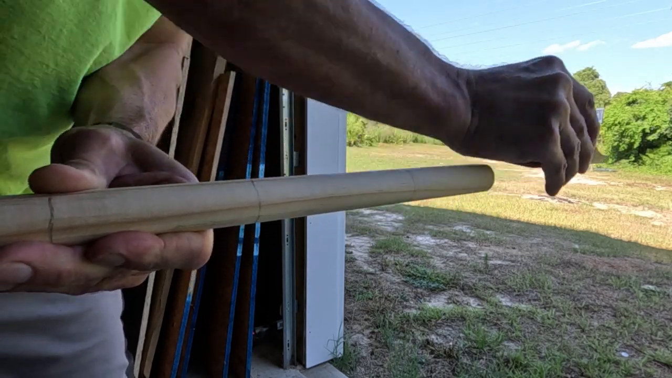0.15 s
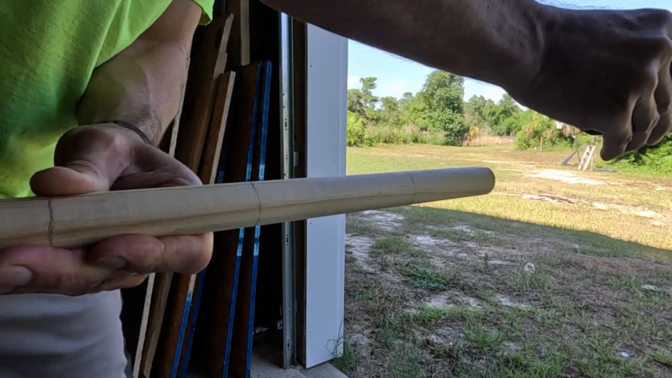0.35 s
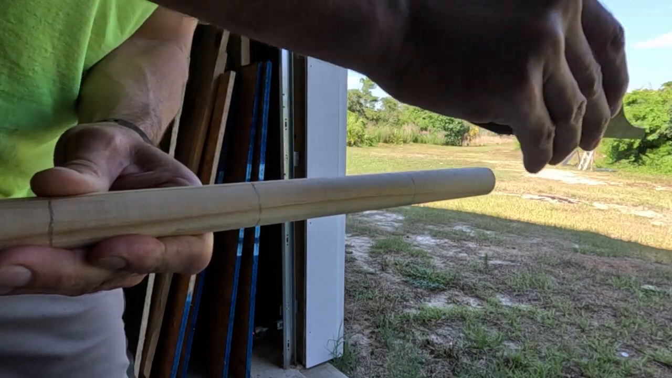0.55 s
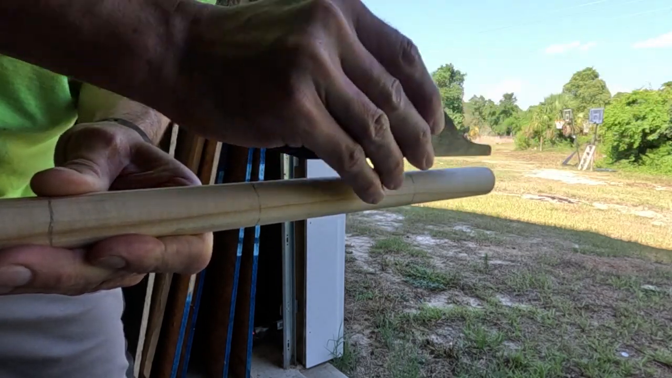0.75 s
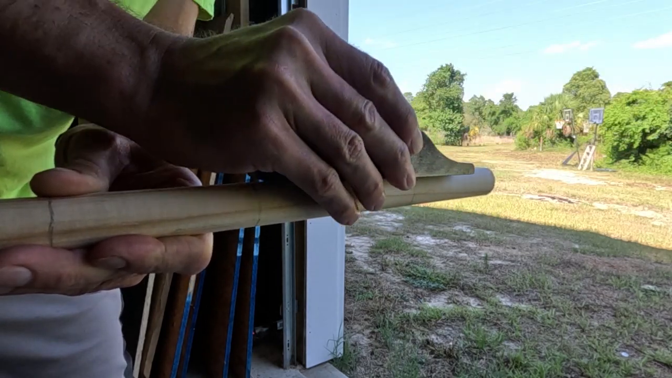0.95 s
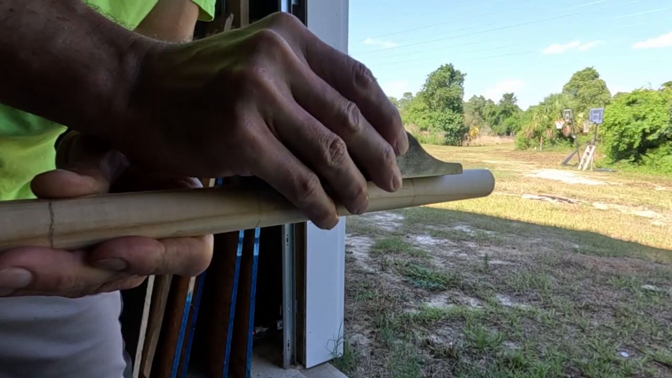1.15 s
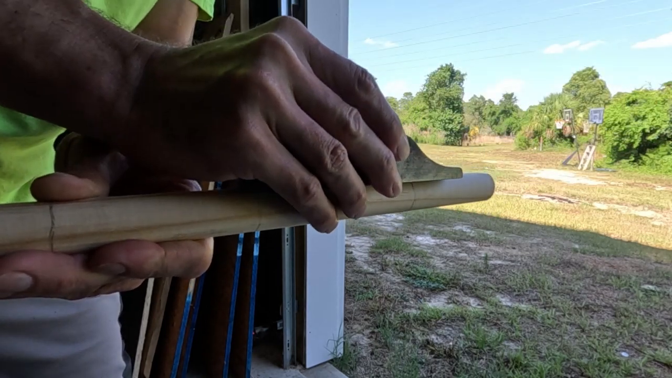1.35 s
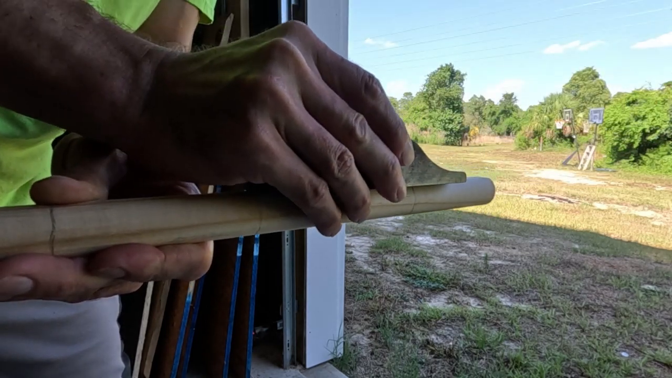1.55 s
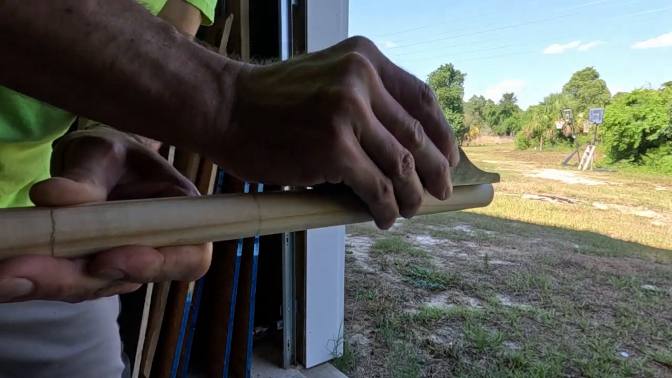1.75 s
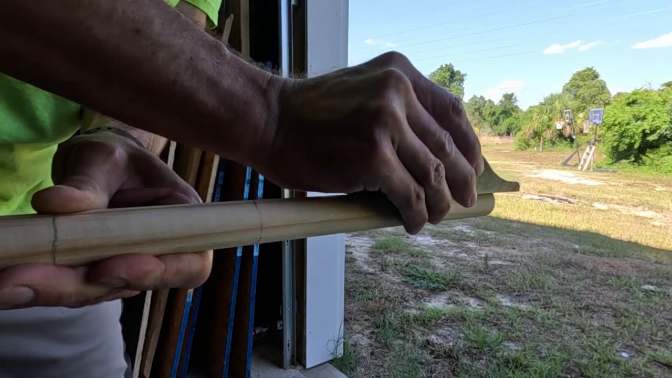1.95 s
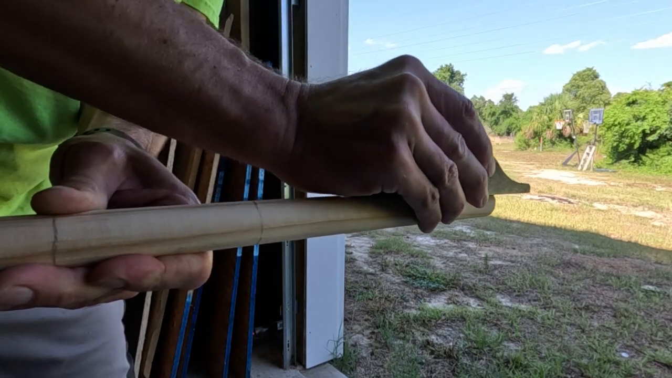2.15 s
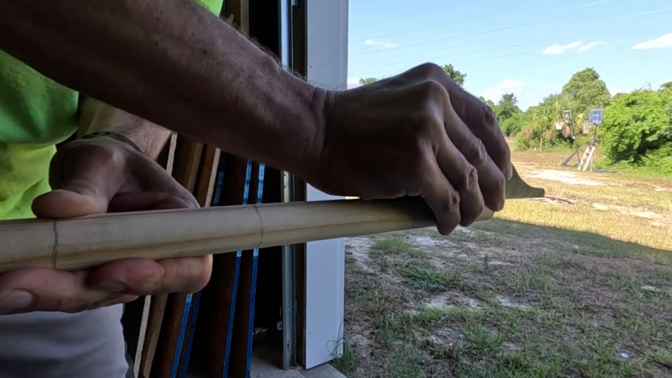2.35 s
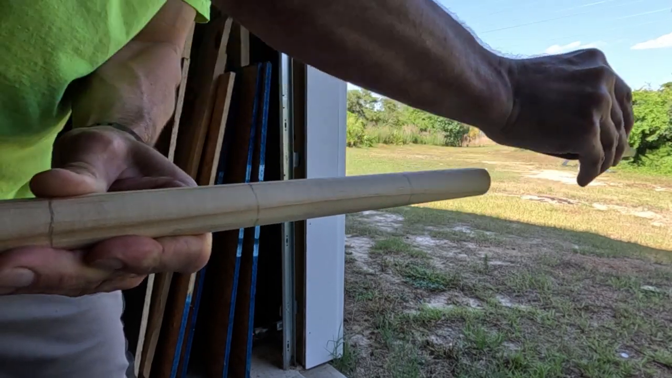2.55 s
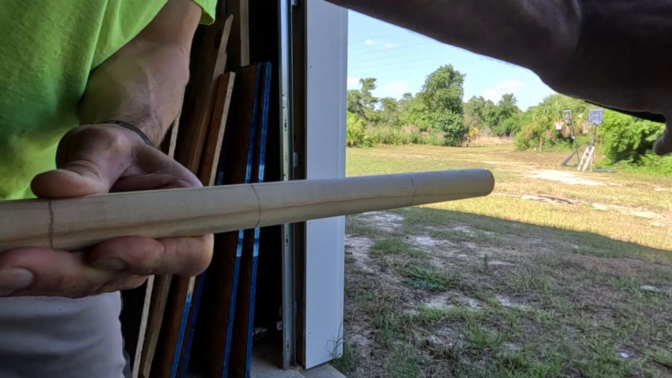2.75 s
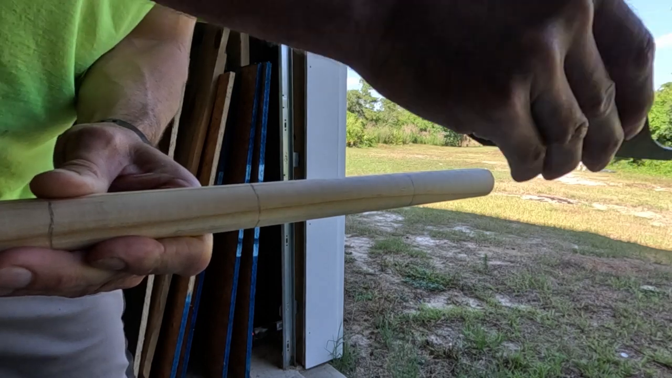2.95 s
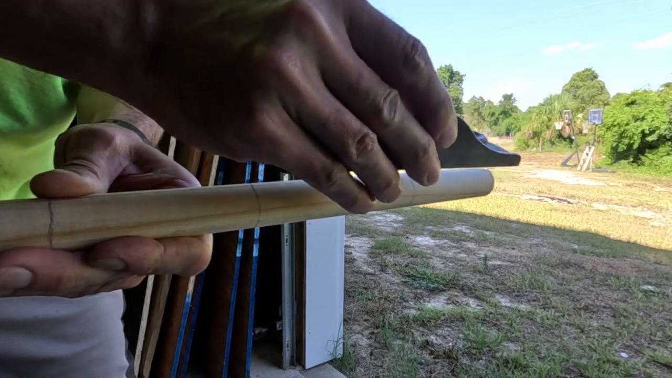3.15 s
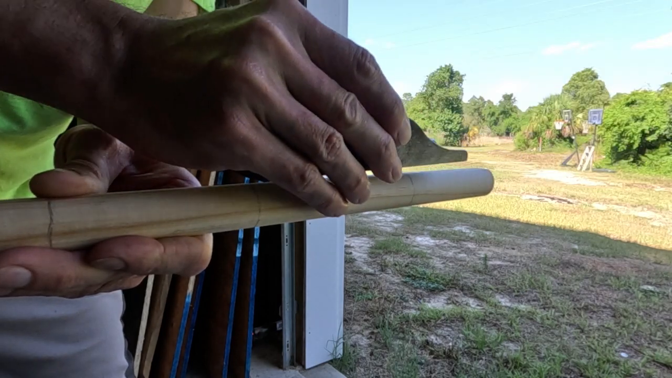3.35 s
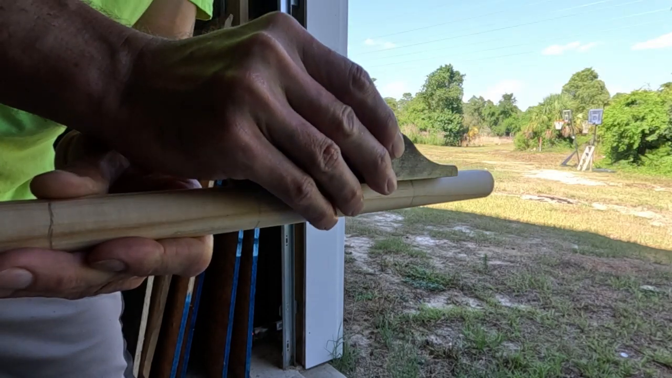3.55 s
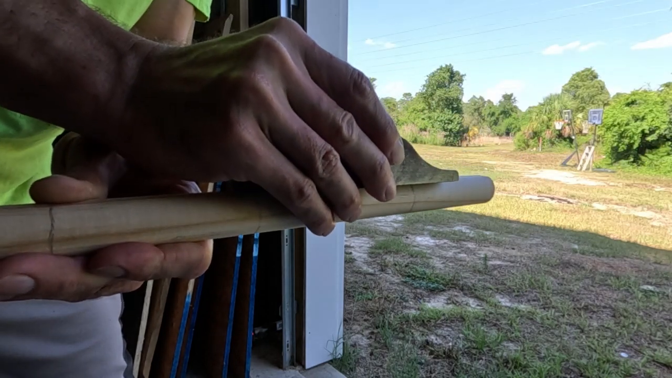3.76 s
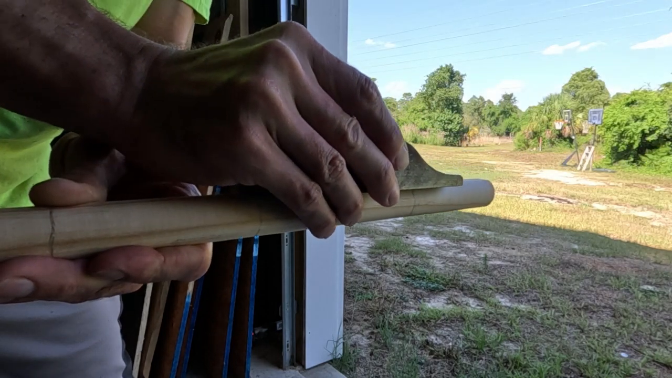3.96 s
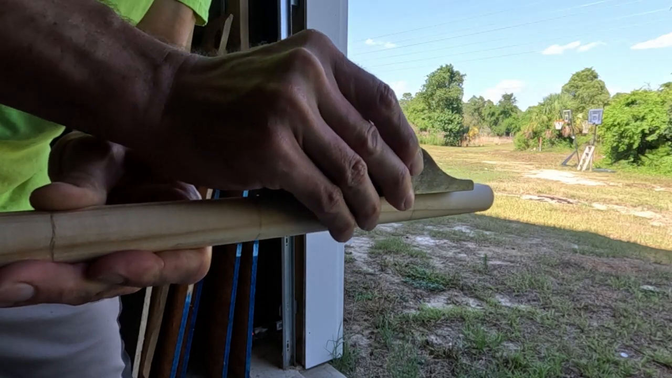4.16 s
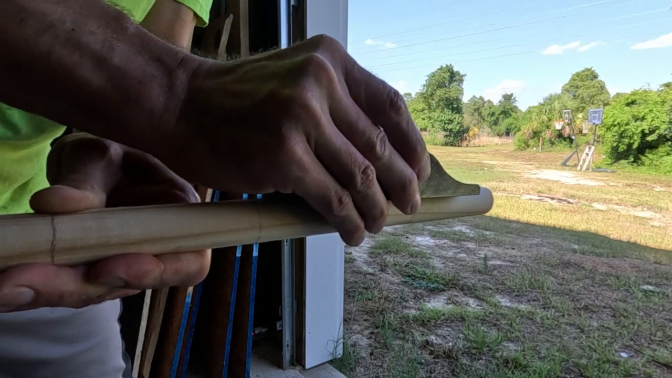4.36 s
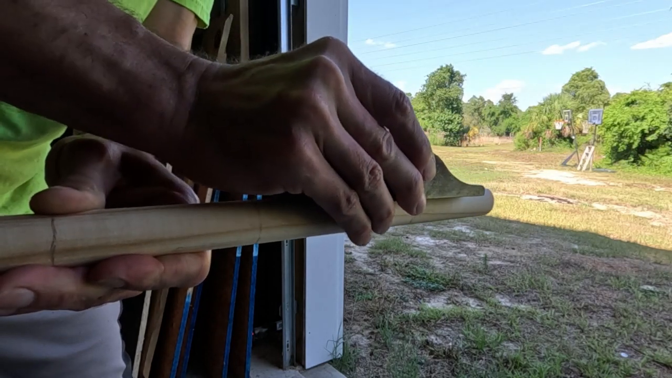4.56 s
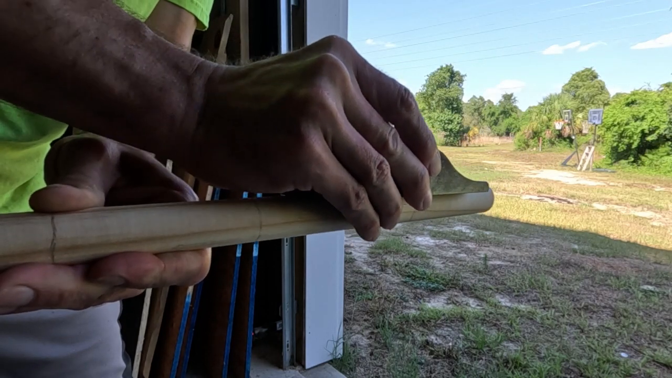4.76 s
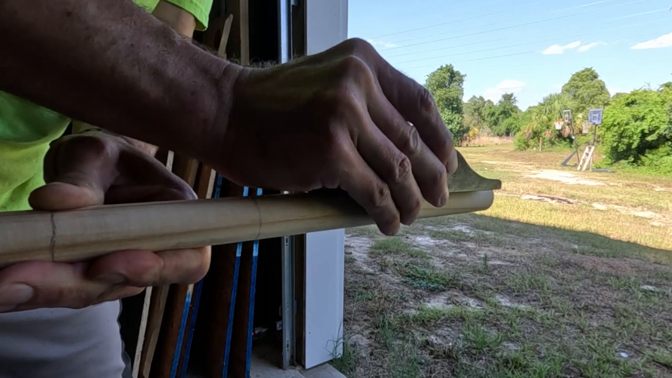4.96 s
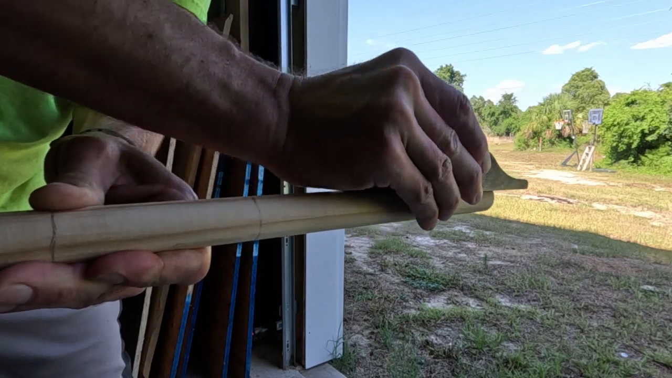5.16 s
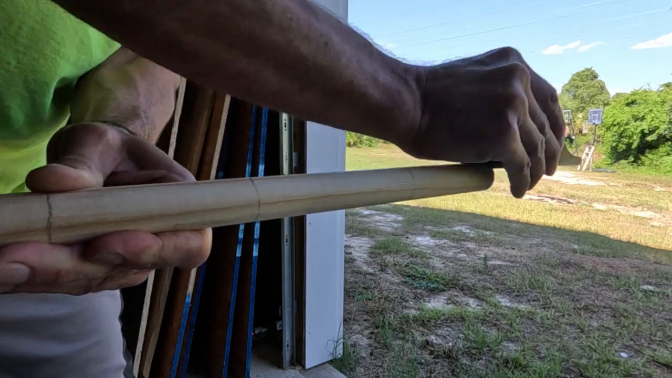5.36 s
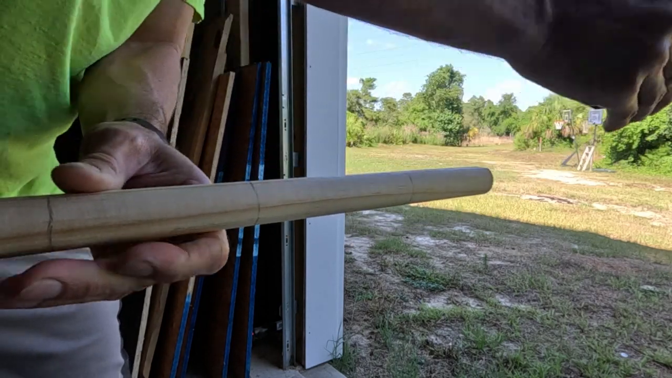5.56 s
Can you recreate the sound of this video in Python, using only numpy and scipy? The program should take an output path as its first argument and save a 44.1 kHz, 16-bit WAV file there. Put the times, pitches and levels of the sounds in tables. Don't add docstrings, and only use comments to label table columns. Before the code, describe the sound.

Very close, in a workshop open to a field. A harsh, fibrous scrape is already running at 0 s, loudest at once, and fades by 0.3 s with low thumping. Near-quiet follows: soft air rumble and a thin, faint insect hiss. At 1.02 s the iron plane is set down with a modest woody-metallic knock and a loose rattle. From about 1.55 s a rasp rises to 1.75 s, short nudges follow, a heavy dull bump lands at 1.97 s, then a stronger push grows from 2.05 to 2.45 s, ending in a thud and a tearing shaving until 2.6 s. Quiet again, with tiny grazes before a hard, bright clack at 3.53 s and a brief slide. Light chatter catches at 4.1 s, with patchy faint scraping to 4.8 s. The last stroke swells from 4.85 s, with low staff hum, to a loud ripping peak at 5.32 s, then small ticks and falling chips end it.

```python
import sys
import numpy as np
from scipy import signal
from scipy.fft import rfft, irfft, next_fast_len
from scipy.io import wavfile
from scipy.ndimage import uniform_filter1d

SR = 44100
rng = np.random.default_rng(int(sys.argv[2]) if len(sys.argv) > 2 else 0)


def volts(x):
    e = np.asarray(x, float) / 20
    return 10 ** e


def store_pcm(level_fs):
    pcm = np.round(np.clip(level_fs, -1, 1) * 32767).astype(np.int16)
    wavfile.write(sys.argv[1], SR, np.atleast_2d(pcm).T)


N = 247401

# f/Hz, width/Hz, level/dB
BLADE_MODES = [(2950, 380, 11), (3560, 380, 13), (4150, 450, 13), (5280, 200, 4), (6850, 140, 5),
               (7250, 300, 5), (9050, 200, -8)]


def seated(gains_db):
    low, main, upper, high, cap = gains_db
    gains_db = [low, main, upper, high, cap, cap, 0]
    return [(hz, width, db + gain_db) for (hz, width, db), gain_db in zip(BLADE_MODES, gains_db)]


# f/Hz, level/(dB per Hz)
FIBRE_HISS = [(650, -100), (1100, -5.5), (1580, 0.5), (1900, -3), (3580, 2.5), (5930, -3.5), (7040, -4.5),
              (8500, -36), (11000, -69), (18700, -120)]
# f/Hz, level/(dB per Hz)
FIZZ_SPECTRUM = [(7000, -17.5), (8200, -3.5), (9500, -2.5), (10500, -18), (11300, -28.5), (12200, -19.5),
                 (13200, -28), (14300, -28.5), (15700, -33)]
# f/Hz, width/Hz, level/dB
BODY_MODES = [(1300, 170, -7), (1445, 60, -3), (1550, 45, 3), (1618, 50, -1), (1692, 38, 0)]
# f/Hz, width/Hz, level/dB
WOOD_MODES = [(534, 3600, 5.5), (627, 100, -14), (782, 84, -1), (974, 760, 2.5)]


def shave(rows, grip, seating):
    tears_per_s, spread_db, judder_db, blade_db = 9000, 1.5, 1.5, -4.5
    firm_db = -55.5
    slowest_ring_db_per_s = 336
    s, force_db = np.transpose(rows)
    t = np.arange(s[0], s[-1], 1 / SR)
    hiss_db = np.interp(t, s, force_db)
    fall_db = slowest_ring_db_per_s * t
    ring_db = np.maximum.accumulate(hiss_db + fall_db) - fall_db
    body_db = grip[0] + ring_db - hiss_db + 0.034 * (firm_db - ring_db)
    wood_db = grip[1] + ring_db - hiss_db + 0.014 * (firm_db - ring_db)
    fizz_db = grip[2] + 0.051 * (firm_db - hiss_db)

    tears = rng.standard_normal(len(t)) * (rng.random(len(t)) < tears_per_s / SR)
    strength_db = spread_db * np.minimum(rng.exponential(1, len(t)), 5)
    force = tears * volts(strength_db + judder_db * flicker(len(t), 0.041))

    blade = modes(force, seated(seating), waver_db=2.5, waver_s=0.01)
    sound = evened(evened(colour(force, FIBRE_HISS)) + volts(blade_db) * blade)
    sound = sound + volts(body_db) * modes(force, BODY_MODES, waver_db=2.0, waver_s=0.024)
    sound = sound + volts(wood_db) * modes(force, WOOD_MODES, waver_db=1.5)
    sound = sound + volts(fizz_db) * evened(colour(force, FIZZ_SPECTRUM))
    fade = signal.windows.tukey(len(t), 0.0011 / (t[-1] - t[0]))
    return s[0], fade * volts(hiss_db) * sound


# t/s, cutting force/dB
LONG_PUSHES = [
    [(1.48, -76), (1.532, -73), (1.608, -52.5), (1.652, -51), (1.662, -45.5), (1.732, -36), (1.776, -52.5),
     (1.79, -51)],
    [(2.03, -69), (2.086, -55), (2.18, -45), (2.292, -45.5), (2.33, -39.5), (2.39, -41), (2.434, -33.5),
     (2.46, -66)],
    [(4.24, -64), (4.328, -57), (4.384, -61), (4.4, -55.5), (4.546, -79), (4.59, -63), (4.694, -53.5),
     (4.8, -79)],
    [(4.8, -115), (4.824, -63.5), (4.89, -54.5), (5.118, -41.5), (5.238, -42), (5.28, -32.5), (5.322, -26),
     (5.338, -60), (5.35, -53)],
]
# t/s, cutting force/dB
SHORT_NUDGES = [
    [(0.0, -31.5), (0.006, -43), (0.056, -39.5), (0.068, -36.5), (0.1, -51)],
    [(0.1, -47.5), (0.136, -41), (0.206, -48), (0.222, -58.5), (0.3, -68)],
    [(1.79, -50), (1.799, -49), (1.804, -38.5), (1.84, -43), (1.921, -53.5), (1.927, -42), (2.03, -116)],
    [(2.46, -44), (2.502, -36.5), (2.554, -46), (2.568, -84), (2.64, -63)],
    [(5.35, -51), (5.385, -41), (5.41, -52), (5.418, -62), (5.43, -65), (5.44, -63)],
    [(5.44, -74), (5.51, -61.5), (5.53, -83), (5.564, -86), (5.61, -70)],
]
# t/s, cutting force/dB
CHATTER_PUSH = [(3.92, -85), (3.94, -68.5), (4.025, -65), (4.05, -56), (4.12, -46.5), (4.18, -59.5),
                (4.239, -65)]
# body/dB, wood/dB, fizz/dB, all over the hiss
PUSH_BEARING = [(-11, -20.5, -12.5), (-7, -10.5, -9), (-3, -8.5, -16), (1, -4, -11)]
NUDGE_BEARING = [(-9.5, -7, -14), (-25, -13.5, -14.5), (-6, -37, -11), (-18.5, -15, -10), (-38, -2.5, -18),
                 (1, 1.5, -23)]
CHATTER_BEARING = (-3, -10.5, -20)
# first four blade modes/dB, cap pair/dB
BLADE_SEATING = [(-3, -2, 0, -19, 2), (-5.5, -1.5, -4, 5, 5.5), (0.5, 5, 3, -13, 2),
                 (-6.5, -0.5, -5, 2, 3.5), (0.5, 0, -9, -1, -7), (6, 0, -3, -6, -6),
                 (-8, -3, -1.5, -6, 3.5), (3, -8, -5, 0, 4), (1, -7, 2, -6, -6), (0, -2, 2, -3, 4),
                 (5, 3, -4, -13, -16)]


def strokes():
    forces = LONG_PUSHES + SHORT_NUDGES + [CHATTER_PUSH]
    grips = PUSH_BEARING + NUDGE_BEARING + [CHATTER_BEARING]
    return track(shave(*stroke) for stroke in zip(forces, grips, BLADE_SEATING))


# t/s, peak/dB,
# f/Hz, width/Hz
SHARP_CLICKS = [(4.1222, -21.5, 2740, 1680), (1.6885, -33, 2800, 1500), (1.8018, -37, 3600, 2500),
                (2.3127, -30, 4300, 900), (5.1033, -35, 3400, 900), (0.25, -42, 4800, 6000),
                (1.0215, -33, 4000, 2500), (1.024, -44, 8500, 1200), (1.0235, -48, 12000, 900),
                (1.031, -29.5, 1310, 250), (1.028, -40, 3200, 900), (1.9697, -25, 760, 590),
                (1.9701, -37, 2200, 1800), (3.5274, -16.5, 4200, 900), (3.5282, -18, 2700, 600),
                (3.528, -44.5, 7500, 3000), (3.19, -62, 2000, 2000), (3.356, -60, 2200, 1800),
                (3.44, -57.5, 2400, 540), (4.1215, -32, 13000, 3000), (0.0692, -31, 12500, 3000),
                (2.435, -31, 11000, 4000), (2.4779, -32, 3570, 1500), (2.0648, -47, 4390, 1200),
                (2.0882, -45, 2500, 1200), (4.4, -45, 4800, 1500), (4.5, -39, 3100, 1500),
                (0.0258, -31, 3230, 1200), (2.437, -30, 1400, 700), (2.7, -55, 6500, 4000)]


def snaps():
    events = []
    for s, peak_db, hz, width in SHARP_CLICKS:
        ring = steep(steep(np.arange(600) == 0, hz, 1.4 * width), hz, 1.4 * width)
        events.append((s, volts(peak_db) * ring / abs(ring).max()))
    return track(events)


def burst(s, rms_db, hz, width, rise_s, t60, length_s=0.05):
    t = np.arange(int((length_s + rise_s) * SR)) / SR
    noise = steep(rng.standard_normal(len(t)), hz, width)
    shape = np.minimum(t / rise_s, 1) ** 2 * volts(-60 * np.maximum(t - rise_s, 0) / t60)
    return s, volts(rms_db) * noise * shape * np.minimum((t[-1] - t) / 0.005, 1)


# t/s, rms/dB, f/Hz, width/Hz, t60/s
SNAGS = [(0.0699, -25, 6530, 7000, 0.015), (0.841, -41.5, 9160, 2050, 0.02), (1.558, -55, 6000, 5000, 0.13),
         (1.801, -56, 4000, 5000, 0.022), (1.9257, -36.5, 5800, 4000, 0.045),
         (2.43, -27.5, 5100, 5900, 0.059), (3.529, -37, 3500, 2490, 0.0024),
         (3.644, -59, 8000, 4000, 0.039), (4.1618, -43, 2470, 3980, 0.063), (4.827, -56, 2500, 4000, 0.039),
         (5.456, -36.5, 5800, 8800, 0.01), (5.4765, -41, 5500, 3500, 0.0094),
         (5.486, -41, 1200, 1200, 0.083), (5.503, -38.5, 2300, 3500, 0.015), (5.581, -54, 6500, 3040, 0.01),
         (5.5867, -41.5, 2230, 2000, 0.017), (5.6065, -49, 5000, 8000, 0.021)]
CATCHES = [
    (4.1212, -38, 3200, 3500, .008),
    (3.5265, -47, 14000, 4000, .006),
    (3.459, -66, 7000, 8000, .05),
]


def snags():
    return track(burst(s, db, hz, width, 0.00053, t60) for s, db, hz, width, t60 in SNAGS + CATCHES)


# t/s, rms/dB, f/Hz, rise/s, t60/s
WHISTLES = [(2.101, -45, 5280, 0.26, .1), (3.439, -55, 4200, .003, .03), (3.45, -73, 4250, .01, .4),
            (.11, -38, 3330, 0.035, 0.063), (2.47, -41, 4350, 0.038, .14),
            (5.2, -33.5, 5270, .12, 0.03), (5.27, -36, 3590, 0.044, 0.032),
            (5.35, -40, 2780, 0.029, .05), (1.924, -33.5, 1600, .006, .06),
            (1.665, -43, 1560, .035, .12), (5.262, -31, 1580, .05, .12), (1.455, -56, 1580, .11, .6)]


def whistles():
    return track(burst(s, db, hz, 200, rise_s, t60) for s, db, hz, rise_s, t60 in WHISTLES)


# t/s, rms/dB, f/Hz, t60/s
SOLE_GRAZES = [
    (1.006, -60, 2200, 0.14),
    (3.497, -57, 2600, 0.6),
    (3.507, -46, 2700, 0.2),
    (3.516, -37.5, 2900, 0.1),
]
# t/s, rms/dB, f/Hz, length/s, t60/s
SCUFFS = [
    (1.06, -61.5, 2780, 0.16, 2.2),
    (3.553, -50.5, 2600, 0.33, 0.57),
    (1.808, -50.5, 1100, 0.069, 1.1),
    (1.9, -56.5, 940, 0.043, 1.1),
]


def sole_rubs():
    grazes = [burst(s, db, hz, 1300, 0.0053, t60) for s, db, hz, t60 in SOLE_GRAZES]
    scuffs = [burst(s, db, hz, 260, 0.0084, t60, length_s) for s, db, hz, length_s, t60 in SCUFFS]
    return track(grazes + scuffs)


# f/Hz, gain/dB
PORT_DULLING = [(9500, -2), (11000, -12.5), (16000, -10.5)]


def small_contacts():
    return colour(snaps() + snags() + whistles() + sole_rubs(), PORT_DULLING)


# t/s, peak/dB, crack/dB and rattle/dB over the peak, rattle t60/s
SET_DOWNS = [
    (1.021, -20.5, -11, -21.5, 0.55),
    (3.526, -14.5, -1, -15, 0.33),
]
# f/Hz, level/dB, t60/s
SET_DOWN_MODES = [
    [(619, -10, .15), (786, -1, .2), (1290, -2, .12), (1550, -8, .12), (2105, 2, .1), (2288, -1, .06),
     (2647, 0, .13), (3050, -4, .035), (4235, 0, .055), (4899, -10, .04), (6800, -13, .035),
     (7600, -13, .025)],
    [(270, 1.5, 0.38), (795, -1, 0.21), (1316, -7.5, 0.088), (1510, -6.5, 0.075), (2060, -23, 0.058),
     (2410, -2.5, .08), (2470, 0.5, 0.089), (2504, 6, 0.1), (3630, 6, 0.046), (4070, 1, 0.04),
     (4450, 12, 0.019)],
]
# f/Hz, level/(dB per Hz)
SET_DOWN_RATTLES = [
    [(210, -26.5), (350, -5), (615, -6.5), (809, -8.5), (1870, -12.5), (2700, -16), (3160, -19),
     (8000, -39), (10400, -61), (17600, -120)],
    [(210, -55), (350, -15), (579, -13), (824, -9.5), (1760, -8.5), (2440, -2.5), (4440, -14.5),
     (8000, -45.5), (11700, -76), (19800, -120)],
]


def landings():
    events = []
    t = np.arange(SR // 2) / SR
    for row, table, rattle in zip(SET_DOWNS, SET_DOWN_MODES, SET_DOWN_RATTLES):
        s, peak_db, crack_db, rattle_db, rattle_t60 = row
        ring = np.zeros(len(t))
        for hz, db, t60 in table:
            level = volts(db - 60 * t / t60 + 1.7 * flicker(len(t), 0.004))
            ring += level * np.sin(2 * np.pi * (hz * t + rng.random()))
        crack = volts(crack_db - 60 * t / 0.0098) / 2
        rattling = volts(rattle_db - 60 * t / rattle_t60) * np.minimum(t / 0.0039, 1)
        noise = evened(colour(rng.standard_normal(len(t)), rattle)) * (crack + rattling)
        onset = np.minimum(t / 0.0004, 1)
        events.append((s, volts(peak_db) * (ring / abs(ring).max() + noise) * onset))
    return colour(track(events), [(7000, -0.5), (10000, 4), (16000, -38)])


# t/s, peak/dB, f/Hz, t60/s, knock/dB over the bump
DULL_BUMPS = [
    (1.178, -31.5, 304, 0.033, -24),
    (1.9692, -0.5, 270, 0.015, -31),
    (2.164, -26.5, 353, 0.077, -16),
    (2.207, -17, 246, 0.057, -21),
    (2.317, -19.5, 206, 0.14, -19),
    (2.4405, -7, 221, 0.063, -12),
    (4.123, -42, 640, 0.05, 2.5),
    (4.166, -46.5, 687, 0.057, 7),
    (4.396, -45.5, 584, 0.03, -6),
    (5.486, -44, 345, 0.26, 3),
]
# t/s, rms/dB, f/Hz, width/Hz, t60/s
STAND_JOLT = (1.969, -33, 750, 450, .022)


def bumps():
    t = np.arange(SR // 4) / SR
    events = [burst(*STAND_JOLT[:4], 0.00053, STAND_JOLT[4])]
    for s, peak_db, hz, t60, knock_db in DULL_BUMPS:
        wood = modes(rng.standard_normal(len(t)), WOOD_MODES + STAND_MODES[2:])
        knock = volts(knock_db - 60 * t / 0.032) * wood
        onset = np.sin(np.pi / 2 * np.minimum(t / 0.0032, 1)) ** 2
        cycles = volts(-60 * t / t60) * np.sin(2 * np.pi * hz * t)
        events.append((s, volts(peak_db) * onset * (cycles + knock)))
    return colour(track(events), [(2500, -1.5), (6000, -27)])


# t/s, held/s, staff bending/dB, stand shaking/dB, stand left-right/dB
HAND_SHOVES = [(0, 0.093, -20.5, -31, -15), (.19, 0.1, -36, -51, 7), (1.029, 0.041, -34.5, -45.5, 2),
               (1.12, 0.12, -44.5, -52.5, 0), (1.69, 0.014, -39.5, -47, 1), (1.84, 0.0093, -39, -53.5, 0),
               (1.977, 0.013, -30, -39, -8), (2.19, 0.058, -33, -31.5, -13),
               (2.315, 0.048, -38, -30, -10.5), (2.451, 0.044, -26.5, -33, -2),
               (3.529, 0.051, -40.5, -40, -5.5), (4.079, 0.026, -41.5, -51.5, -3),
               (4.701, 0.053, -45.5, -61, -3), (4.962, 0.11, -26.5, -49, 0), (5.094, 0.13, -23, -31.5, 1),
               (5.251, 0.12, -30, -45, 2), (5.5, 0.072, -37, -47.5, 1), (1.59, 0.081, -56.5, -52.5, 2.5),
               (4.25, 0.24, -53.5, -61, -1)]
BLOW_ROWS = [2, 10]


def shoving():
    swell_db_per_s, strike_db_per_s, ease_db_per_s = 244, 4002.5, 243
    linger_db, linger_db_per_s = -12, 82
    rest_db, stand_rest_db, stand_rest_pan_db = -63, -75.5, -10.5
    t = np.arange(0, N + 64, 64) / SR
    s, held, bend_db, stand_db, pan_db = np.transpose(HAND_SHOVES)[:, :, None]
    early, late = np.maximum(s - t, 0), np.maximum(t - s - held, 0)
    struck = np.isin(np.arange(len(HAND_SHOVES)), BLOW_ROWS)
    swell = np.where(struck, strike_db_per_s, swell_db_per_s)[:, None]
    after = volts(-2 * ease_db_per_s * late) + volts(2 * (linger_db - linger_db_per_s * late))
    power = volts(-2 * swell * early) * after
    stand, rest = volts(2 * stand_db) * power, volts(2 * stand_rest_db)
    shaking = stand.sum(0) + rest
    bending = (volts(2 * bend_db) * power).sum(0) + volts(2 * rest_db)
    pan = ((pan_db * stand).sum(0) + stand_rest_pan_db * rest) / shaking
    return [np.interp(np.arange(N) / SR, t, c) for c in (np.sqrt(bending), np.sqrt(shaking), pan)]


# f/Hz, width/Hz, level/dB
BEND_MODES = [(140.06, 11.4, 2.5), (158.8, 6.5, -12), (111.3, 5.3, -8)]
# f/Hz, width/Hz, level/dB
STAND_MODES = [(204.1, 25.8, 7), (260.5, 20.3, 1), (338.3, 46, -6.5)]


def staff_and_stand():
    bending, shaking, pan_db = shoving()
    push, shake, other = rng.standard_normal((3, N))
    apart = 0.14 * modes(other, BEND_MODES + STAND_MODES)
    bend = placed(modes(push, BEND_MODES), 0.18) + [apart, -apart]
    stand = placed(modes(shake, STAND_MODES), pan_db) + [apart, -apart]
    return bending * bend + shaking * stand


# f/Hz, left-right/dB
NEAR_LEAN = [(60, -0.5), (110, 3), (200, -6), (380, 1), (700, 2.5), (1290, 7.5), (2380, 7.5), (4400, 2.5),
             (8120, 3.5), (15000, 6.5)]


def leaning(x):
    return np.array([colour(x, [(hz, sign * db / 2) for hz, db in NEAR_LEAN]) for sign in (1, -1)])


# f/Hz, t60/s
SHOP_DECAY = [(200, 0.4), (1000, 0.39), (3000, 0.31), (8000, 0.23), (14000, 0.3)]


def shop(x):
    taps = np.zeros((2, SR))
    at = np.arange(200, SR - 20, 20) + rng.integers(0, 20, (2, (SR - 201) // 20))
    np.put_along_axis(taps, at, rng.choice([-1., 1.], at.shape), 1)
    taps[1] = 0.21 * taps[0] + 1.05 * taps[1]
    hz, t, z = signal.stft(taps, SR, nperseg=256)
    decay = volts(-60 * t / read(SHOP_DECAY, hz)[:, None])
    tail = signal.istft(z * decay, SR, nperseg=256)[1]
    return signal.fftconvolve(x[None], tail / np.linalg.norm(tail[0]), axes=1)[:, :N]


# f/Hz, level/(dB per Hz)
RUMBLE_SPECTRUM = [(7.1, -37.5), (12, -0.5), (38, -1), (97, -7.5), (118, -17), (145, -40.5), (173, -23.5),
                   (214, -46), (300, -60.5), (390, -68), (660, -120)]
# t/s, rumble/dB
AIR_LEVEL = [(0.0, -35), (0.09, -26), (0.51, -40.5), (0.81, -40), (1.14, -37), (1.34, -45), (1.94, -44),
             (1.98, -28), (2.39, -33.5), (2.5, -26.5), (2.59, -35), (3.27, -44), (3.81, -39), (4.44, -51),
             (4.53, -42), (4.67, -47.5), (4.7, -37.5), (5.61, -38)]


def rumble():
    level_db = np.interp(np.arange(N) / SR, *np.transpose(AIR_LEVEL))
    mid, side = colour(rng.standard_normal((2, N)), RUMBLE_SPECTRUM)
    air = evened(np.array([mid + 0.24 * side, mid - 0.24 * side]))
    lurch = steep(rng.standard_normal(N), 32.2, 13.3)
    sway = volts(0.72 * (level_db + 24.5)) * placed(lurch, 11.7)
    return volts(level_db) * (air + sway)


# f/Hz, level/(dB per Hz)
FIELD_SPECTRUM = [(254, -49.5), (900, -51.5), (3760, -53), (5060, -42), (6520, -51), (9360, -48),
                  (11100, -63.5), (15900, -65)]
# f/Hz, left-right likeness/1
FIELD_LIKENESS = [(60, 0.99), (150, 0.6), (380, 0.15), (950, 0.25), (2380, 0.23), (5980, 0.3),
                  (15000, 0.13)]
# t/s, swell/dB
FIELD_SWELL = [(0, 0.5), (1.2, 5), (2.9, 1), (5.61, 5)]


def field():
    frames, hz = N // 256 + 5, np.fft.rfftfreq(1024, 1 / SR)
    a, b, c, d, patches = rng.standard_normal((frames, 513, 5)).T
    patches = evened(uniform_filter1d(uniform_filter1d(patches, 14, 0), 20, 1))
    same = np.clip(read(FIELD_LIKENESS, hz), -1, 1)[:, None]
    left = a + 1j * b
    z = np.array([left, same * left + np.sqrt(1 - same ** 2) * (c + 1j * d)])
    z *= volts(read(FIELD_SPECTRUM, hz)[:, None] + 0.24 * patches) * (hz > 300)[:, None]
    hiss = evened(signal.istft(z, nperseg=1024, noverlap=768)[1][:, :N])
    return volts(-72.5 + np.interp(np.arange(N) / SR, *np.transpose(FIELD_SWELL))) * hiss


def track(events):
    mix = np.zeros(N)
    for s, sound in events:
        part = mix[round(s * SR):][:len(sound)]
        part += sound[:len(part)]
    return mix


def evened(x):
    return x / np.sqrt(np.mean(x ** 2) + 1e-20)


def read(points, hz):
    f, value = np.transpose(points)
    return np.interp(np.log(hz + 1), np.log(f + 1), value)


def colour(x, points):
    size = next_fast_len(x.shape[-1] + 4096)
    gain = volts(read(points, np.fft.rfftfreq(size, 1 / SR)))
    return irfft(rfft(x, size) * gain, size)[..., :x.shape[-1]]


def resonate(x, hz, width):
    r = np.exp(-np.pi * abs(width) / SR)
    return 2 * signal.lfilter([1 - r], [1, -r * np.exp(2j * np.pi * hz / SR)], x).real


def steep(x, hz, width):
    return evened(resonate(resonate(x, hz, 1.55 * width), hz, 1.64 * width))


def modes(x, table, waver_db=0, waver_s=0.055):
    total = 0
    for hz, width, db in table:
        total = total + volts(db + waver_db * flicker(len(x), waver_s)) * steep(x, hz, width)
    return evened(total)


def flicker(length, seconds):
    span = max(int(seconds * SR), 1)
    return evened(uniform_filter1d(uniform_filter1d(rng.standard_normal(length), span), span))


def placed(x, pan_db):
    return np.array([x * volts(pan_db / 2), x * volts(-pan_db / 2)])


def scene():
    cutting = strokes() + small_contacts()
    knocks, soft = landings(), bumps()
    echo = shop(volts(-7.5) * cutting + volts(-14.0) * knocks + volts(-13.5) * soft)
    near = leaning(cutting + knocks) + placed(soft, -11.0) + echo
    return near + staff_and_stand() + rumble() + field()


# t/s, side gain/dB
STEREO_WIDTH = [(0, -8), (.3, -11), (0.502, -9), (1.5, -5), (1.9, -2.5), (2, 0), (2.6, -1.5), (3, -19),
                (3.07, -43), (4, -36.5), (4.1, -16.5), (4.7, -8.5), (4.9, -4.5), (5.61, -6.5)]


def narrowed(side):
    return side * volts(np.interp(np.arange(N) / SR, *np.transpose(STEREO_WIDTH)))


def roll_off(x):
    return signal.sosfilt(signal.butter(12, 16050, fs=SR, output="sos"), x)


def record(dry):
    mid, side = (dry[0] + dry[1]) / 2, (dry[0] - dry[1]) / 2
    treble = signal.firwin(401, 11200, fs=SR, pass_zero=False)
    late_treble = signal.oaconvolve(mid, treble)[:N]
    side = narrowed(side) + volts(-2.5) * late_treble
    edge = signal.firwin(767, 15800, fs=SR)
    mix = signal.oaconvolve([mid + side, mid - side], edge[None], "same")
    return roll_off(mix)


dry = scene()
out = record(dry)
store_pcm(out)
```